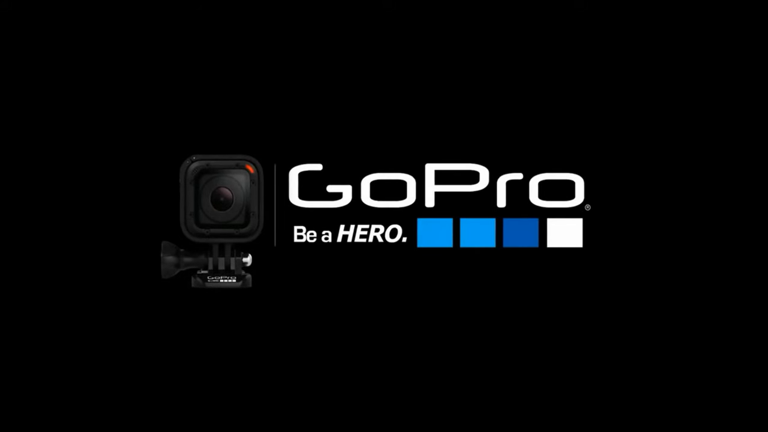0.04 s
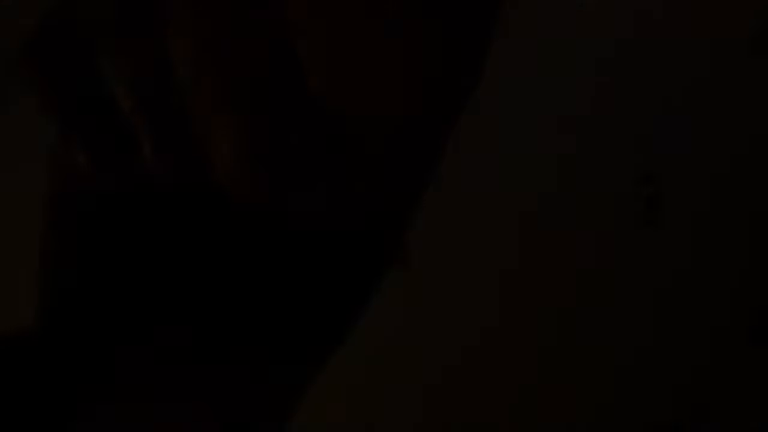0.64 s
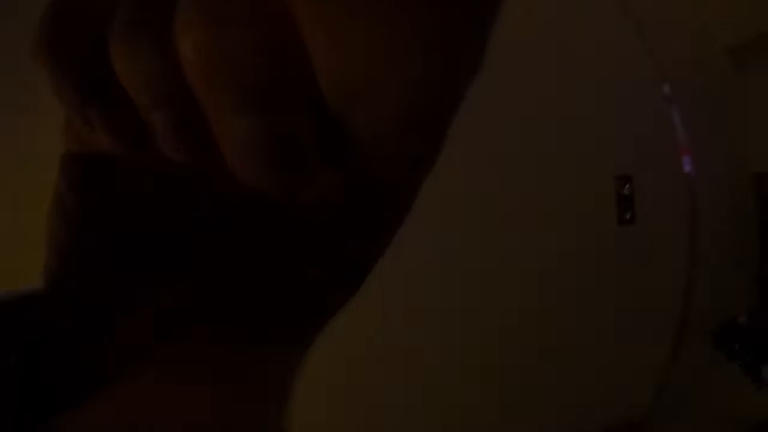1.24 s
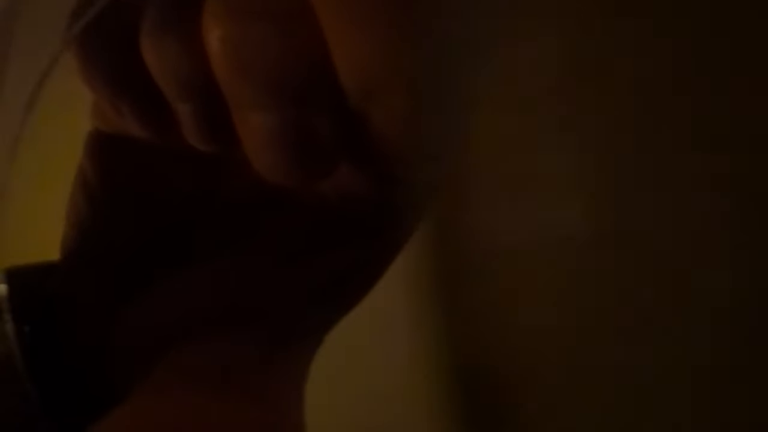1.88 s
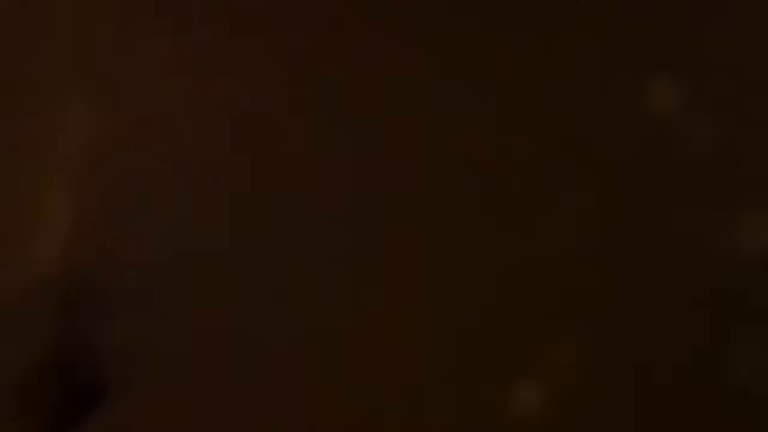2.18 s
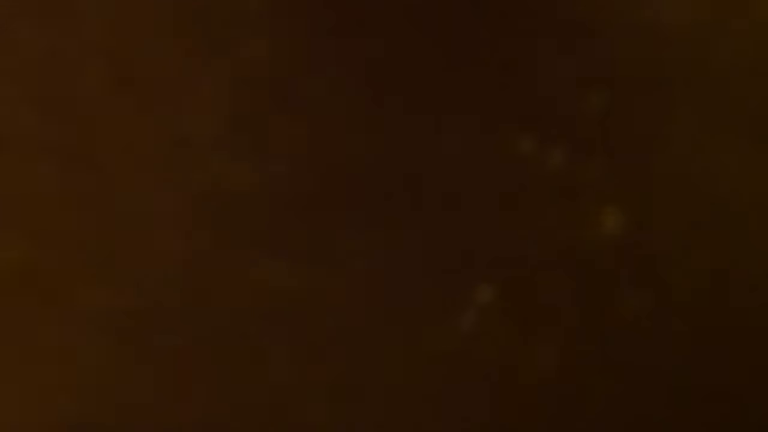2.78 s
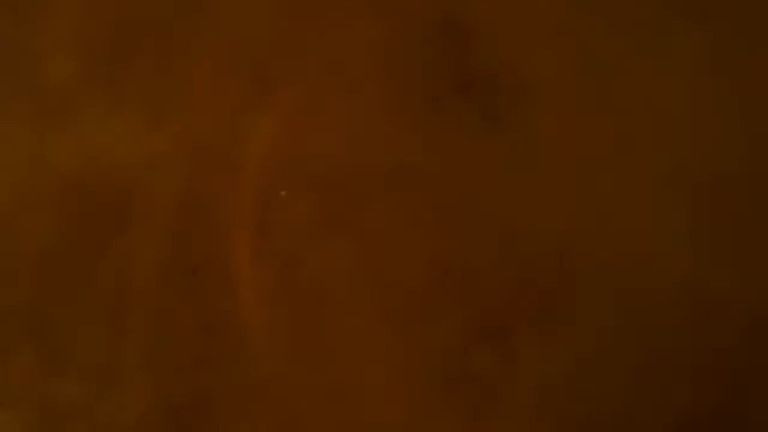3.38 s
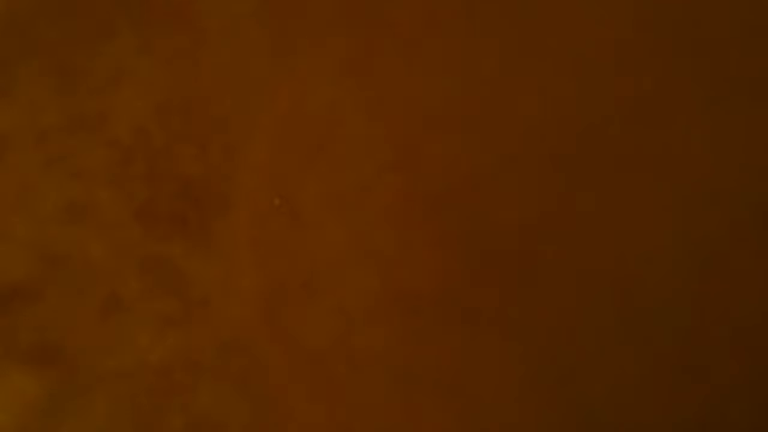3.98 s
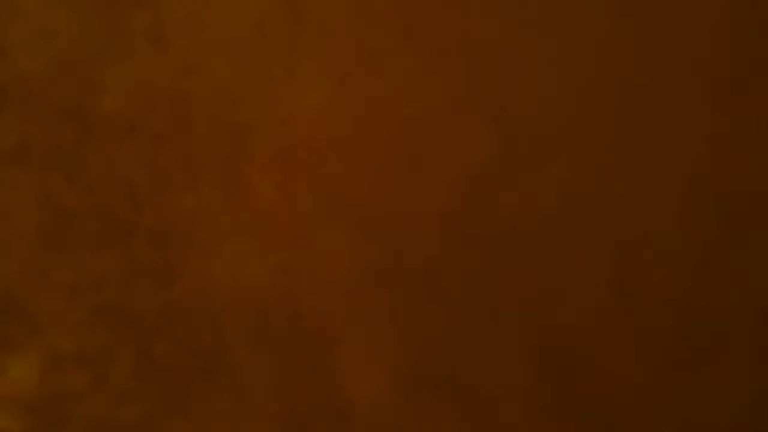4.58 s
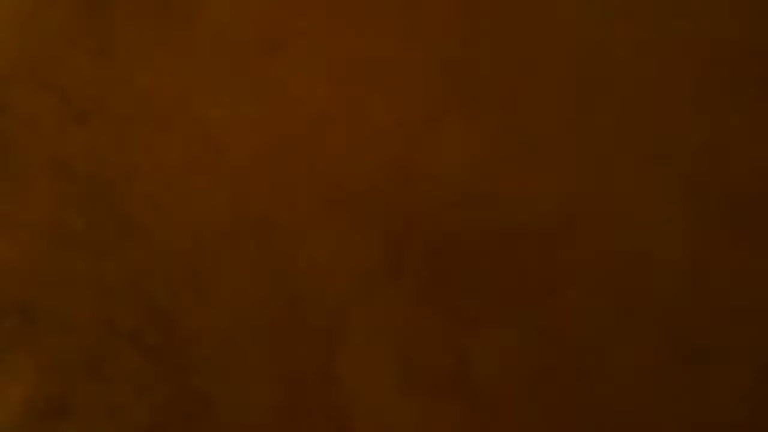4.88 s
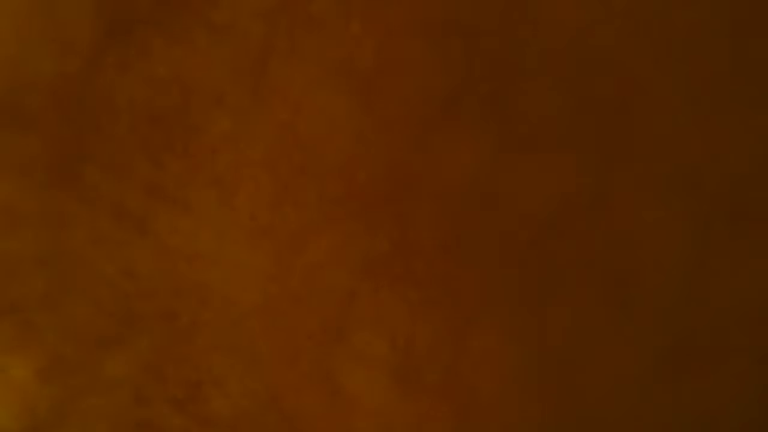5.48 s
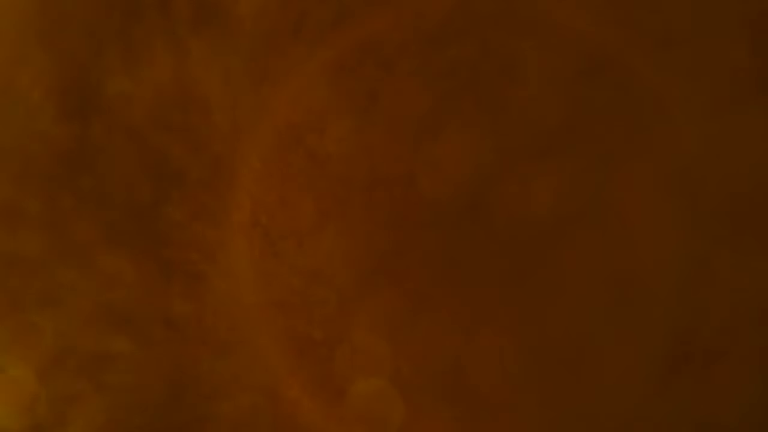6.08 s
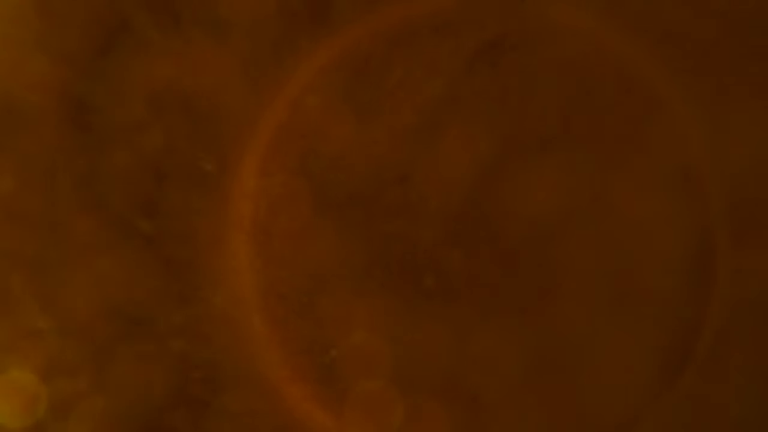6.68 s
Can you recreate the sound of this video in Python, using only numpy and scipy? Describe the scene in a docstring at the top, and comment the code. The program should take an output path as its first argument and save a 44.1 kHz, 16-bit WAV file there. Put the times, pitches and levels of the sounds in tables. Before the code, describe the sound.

Heard from a small waterproof microphone inside a glass, a soft knock is followed by crisp drops and a wet splatter as beer pours in. The liquid closes over the microphone and the sound turns to rapid, muffled plopping and glugging with bright ticks of spray. The hollow tone of the glass rises as it fills, and the pour softens to small bubbles and fine crackling foam.

```python
"""Bottom of a glass, at a small waterproof camera, as beer is poured in.
The first drops spatter on the housing; once it is covered, the stream is heard from within the liquid
as dull plops. Each plop rings the beer and the air column above it. The beer's ring sinks as it deepens
and fills with gas; the column's pitch climbs as the glass fills. Foam fizzes and the camera whines."""
import sys
import numpy as np
from scipy import signal
from scipy.fft import rfft, irfft
from scipy.io import wavfile

SR = 44100
rng = np.random.default_rng(int(sys.argv[2]) if len(sys.argv) > 2 else 0)


def dump_mix(stems):
    """Bounce the given channels to the path in sys.argv[1] as a 16-bit WAV at rate SR."""
    frames = np.atleast_2d(stems).T  # one column per channel
    limited = np.clip(frames, -1, 1)  # hard clip at full scale
    pcm = np.round(limited * 32767).astype(np.int16)
    wavfile.write(sys.argv[1], SR, pcm)


N = 297234
TIME = np.arange(N) / SR
POUR_S, COVERED_S, SHALLOW_UNTIL_S, SUBMERGED_S = 1.23, 1.6, 2, 2.28  # covered: bottom; submerged: camera

# spectrum of a drop on the housing: f/Hz, level/dB
DROP_SPECTRUM = [(1300, -45), (2500, -23), (4000, -2.5), (5200, -5.5), (7000, 0), (9000, 3.5), (11000, 7.5),
                 (13000, 4), (16000, -7.5)]
# spectrum of a wet splash: f/Hz, level/dB
SPLASH_SPECTRUM = [(500, -5), (1100, -5), (1750, 2), (2300, -2), (2900, 1), (3700, -2.5), (5000, -9.5),
                   (6500, -7.5), (7600, -13)]


def from_db(db):
    """Decibels to gain."""
    return 10 ** (np.asarray(db) / 20)


def rms_one(x):
    """Scale to rms 1."""
    return x / np.sqrt(np.mean(x ** 2) + 1e-20)


def in_time(rows):
    """Interpolate rows of (t/s, values...) to one curve per column."""
    times_s, *columns = np.transpose(rows)
    return [np.interp(TIME, times_s, column) for column in columns]


def add(out, at_s, sound):
    """Mix a short sound in."""
    i = max(int(at_s * SR), 0)
    out[..., i:i + sound.shape[-1]] += sound[..., :N - i]


def drift(knots_per_s):
    """Random wander: lines between unit Gaussian knots."""
    knots = rng.standard_normal(2000)
    return np.interp(TIME * knots_per_s, np.arange(len(knots)), knots)


def trapezoid(start_s, attack_s, end_s, release_s):
    """Linear fade in, hold at 1, fade out."""
    return np.clip(np.minimum((TIME - start_s) / attack_s, (end_s - TIME) / release_s), 0, 1)


def colour(x, spectrum, size=2048):
    """Minimum-phase filter of unit energy with the given spectrum."""
    hz, db = np.transpose(spectrum)
    grid_hz = np.maximum(np.arange(size // 2 + 1) * SR / size, 1)
    gain = from_db(np.interp(np.log(grid_hz), np.log(hz), db))
    cepstrum = irfft(np.log(gain))
    cepstrum[1:size // 2] *= 2
    cepstrum[size // 2 + 1:] = 0
    response = irfft(np.exp(rfft(cepstrum)))
    return signal.fftconvolve(x, response[None] / np.linalg.norm(response), axes=-1)[:, :N]


def panned(x, pan_db):
    """Place between the two microphone ports; pan is left minus right."""
    return x * from_db(np.array([[.5], [-.5]]) * pan_db)


def stereo_noise(correlation):
    """White noise, partly common to both ports."""
    shared, own = rng.standard_normal(N), rng.standard_normal((2, N))
    return np.sqrt(correlation) * shared + np.sqrt(1 - correlation) * own


def band_noise(low_hz, high_hz):
    """Band-passed noise, rms 1."""
    band = signal.butter(2, [low_hz, high_hz], "band", fs=SR, output="sos")
    return rms_one(signal.sosfilt(band, rng.standard_normal(N)))


def grains(per_s, spread_db):
    """Random clicks, many small and a few large."""
    sizes = from_db(spread_db * np.minimum(rng.exponential(1, N), 2.7))
    return sizes * (rng.random(N) < per_s / SR)


def crackle(per_s, spread_db, grain_s, correlation):
    """Tiny noise bursts in loose spurts, rms 1."""
    spurt_db, spurts_per_s = 3.3, 45
    sizes = grains(per_s, spread_db) * from_db(spurt_db * drift(spurts_per_s)) / np.sqrt(per_s)
    t = np.arange(-400, 400) / SR
    grain = np.exp(-abs(t) / grain_s * np.where(t < 0, 4, 2))
    power = np.maximum(signal.fftconvolve(sizes ** 2, grain, "same"), 0)
    return rms_one(np.sqrt(power) * stereo_noise(correlation))


def ring(hz, decay_s, soft_s, highpass_ratio, size=2400):
    """A rounded suction pulse drives a damped mode; little leaks out far below its pitch."""
    t, push_t = TIME[:size], TIME[:size // 20]
    push = np.exp(-.5 * (push_t / soft_s - 3) ** 2)
    push /= abs(np.sum(push * np.exp(-2j * np.pi * hz * push_t)))  # unit gain at the mode
    mode = np.sin(2 * np.pi * hz * t) * np.exp(-t / decay_s)
    swing = np.gradient(mode) * SR / (2 * np.pi * hz)
    pole = np.exp(-2 * np.pi * highpass_ratio * hz / SR)
    radiated = signal.lfilter([1, -1], [1, -pole], swing)
    return -np.convolve(radiated, push)[:size]


def snap(hz, cycles, soft_s):
    """A very short ring, peak 1."""
    sound = ring(hz, cycles / hz, soft_s, highpass_ratio=.23)
    return sound / abs(sound).max()


def bubble(hz, cycles, rise, swell_cycles=.28):
    """A bubble swells in and rings; its pitch climbs by the fraction `rise` per 1/e of decay."""
    turns = hz * TIME[:2500]
    envelope = (1 - np.exp(-(turns / swell_cycles) ** 2)) * np.exp(-turns / cycles)
    phase = 2 * np.pi * turns * (1 + rise * (turns / cycles / 2 - 1))
    return envelope / envelope.max() * np.sin(phase)


def splashes(clicks, decay_s):
    """Each click becomes a short wet burst of the same energy."""
    fall = np.exp(-2 * TIME[:SR // 20] / decay_s)
    power = np.maximum(signal.fftconvolve(clicks ** 2, fall / fall.sum())[:N], 0)
    return colour(np.sqrt(power) * rng.standard_normal((1, N)), SPLASH_SPECTRUM)[0]


def air_hz(at_s, empty_m=.146, shortest_m=.04, fill_m_per_s=.0085, fill_m_per_s2=.0033):
    """Quarter-wave pitch of the air column, which shortens a little faster as the head builds."""
    sound_m_per_s = 343
    t = np.maximum(at_s - COVERED_S, 0)
    length_m = np.maximum(empty_m - fill_m_per_s * t - fill_m_per_s2 * t ** 2 / 2, shortest_m)
    return sound_m_per_s / (4 * length_m)


def liquid_hz(at_s, shallow_hz=244, submerged_hz=523, deep_hz=155, sink_s=.812):
    """The beer's ring: low in the shallows, high over the camera, then sinking with depth and gas."""
    if at_s < SHALLOW_UNTIL_S:
        return shallow_hz
    return deep_hz + (submerged_hz - deep_hz) * np.exp(-max(at_s - SUBMERGED_S, 0) / sink_s)


def liquid_cycles(at_s, clear_cycles=2.7, gassy_cycles=.84, clouding_s=.72):
    """Cycles to 1/e: the ring shortens as the beer clouds with gas."""
    clarity = np.exp(-max(at_s - SUBMERGED_S, 0) / clouding_s)
    return gassy_cycles + (clear_cycles - gassy_cycles) * clarity


def camera(hiss_db=-50.5, whine_hz=15626, waver_db=2.3):
    """Electronics: bright hiss at both ports, a thin wavering whine on the right."""
    # hiss: f/Hz, level/dB
    hiss_spectrum = [(59, -31), (100, 3.5), (196, 2.5), (236, -0.5), (472, -4.5), (570, -8), (1920, -15),
                     (2800, -11), (4000, -12.5), (5150, -10), (5960, -9.5), (8880, -4.5), (15000, -4)]
    # whine: t/s, level/dB
    whine_levels = [(0.0, -52), (0.2, -61), (0.49, -47.5), (1.48, -55), (2.03, -50), (2.05, -61),
                    (3.11, -47.5), (3.36, -62), (6.18, -48.5), (6.4, -69), (6.48, -54), (6.74, -58)]
    hiss = from_db(hiss_db) * colour(stereo_noise(correlation=.14), hiss_spectrum)
    whine_rms = from_db(in_time(whine_levels)[0] + waver_db * drift(40))
    whine = np.sqrt(2) * whine_rms * np.sin(2 * np.pi * whine_hz * TIME)
    return panned(hiss, pan_db=-.7) + panned(whine, pan_db=-12)


def settling(level_db=-60, fade_s=(.3, .97)):
    """Faint ticks on the housing before the pour."""
    ticks = colour(crackle(per_s=40, spread_db=0, grain_s=.0005, correlation=.89), DROP_SPECTRUM)
    return from_db(level_db) * np.interp(TIME, fade_s, [1, 0]) * ticks


def knocks(soft_cycles=.11, air_db=-13, air_decay_s=.013):
    """Dead knocks as the empty glass is handled; each faintly rings the air inside."""
    # knocks: t/s, peak/dB, f/Hz
    taps = [(0.18, -45.5, 2730), (0.979, -32.5, 635)]
    out = np.zeros(N)
    for at_s, db, hz in taps:
        hollow = bubble(air_hz(at_s), air_decay_s * air_hz(at_s), rise=0)
        add(out, at_s, from_db(db) * snap(hz, cycles=.62, soft_s=soft_cycles / hz))
        add(out, at_s, from_db(db + air_db) * hollow)
    return out


def surge(still_db=-78, pouring_db=-70):
    """Slow pressure swings on the housing: a faint floor that rises with the pour, and a few swells."""
    # liquid pushing on the housing: t/s, level/dB, half-width/s
    pushes = [(1.53, -37, 0.02), (1.873, -48, 0.022), (2.2, -62, 0.14), (2.98, -43, 0.17),
              (4.735, -56, 0.041)]
    swells = sum(from_db(db) * np.exp(-((TIME - at_s) / width_s) ** 2) for at_s, db, width_s in pushes)
    floor = from_db(np.where(TIME < POUR_S, still_db, pouring_db))
    return (floor + swells) * band_noise(low_hz=30, high_hz=95)


def foam():
    """Dense wet spray while the stream hits the shallows, easing to a fine sparkle of foam."""
    # spray and foam: t/s, splash level/dB, fizz level/dB
    levels = [(1.2, -44, -65), (1.31, -87, -61), (1.52, -55, -62), (1.55, -55, -36.5), (1.69, -58, -35),
              (1.85, -42, -35), (2.0, -52.5, -45), (2.25, -53, -57), (2.65, -56, -45), (2.95, -51, -51),
              (3.2, -53, -42), (3.6, -53.5, -48.5), (4.16, -55, -48), (5.13, -59.5, -52), (6.2, -62, -54),
              (6.74, -67, -54.5)]
    # fizz: f/Hz, level/dB
    fizz_spectrum = [(2350, -22), (4000, 0), (5050, -1.5), (6580, 0), (8210, 1), (9740, 6.5), (11700, 3),
                     (15000, -11)]
    splash_db, fizz_db = in_time(levels)
    splash = colour(crackle(per_s=410, spread_db=1.5, grain_s=.0013, correlation=1), SPLASH_SPECTRUM)
    shallow = TIME < SHALLOW_UNTIL_S
    per_s, spread_db = np.where(shallow, 420, 520), np.where(shallow, 3.5, 1.5)
    fizz = colour(crackle(per_s, spread_db, grain_s=.0006, correlation=.0053), fizz_spectrum)
    return (TIME > POUR_S) * (from_db(splash_db) * splash + panned(from_db(fizz_db) * fizz, pan_db=-1))


def flecks(level_db=-44):
    """Droplets thrown off the first drops tick sharply on the dry housing."""
    ticks = colour(crackle(per_s=170, spread_db=4, grain_s=.0004, correlation=.079), DROP_SPECTRUM)
    return from_db(level_db) * (TIME > POUR_S) * (TIME < COVERED_S) * ticks


def bubbles():
    """Single ringing bubbles; the heavily damped ones glide the most."""
    # bubbles: t/s, peak/dB, f/Hz, 1/e decay/cycles
    singles = [(1.232, -34, 220, 1.5), (1.237, -18, 3045, 12), (1.238, -22, 3340, 8.2),
               (1.263, -27.5, 216, 0.98), (1.365, -20.5, 4100, 11), (1.378, -36.5, 254, 1.2),
               (1.406, -39, 330, 0.55), (1.463, -34.5, 1590, 6.9), (1.582, -26, 3050, 4.4),
               (1.636, -34, 1750, 7.4), (1.687, -24, 3000, 7.2), (1.716, -22, 1680, 2.3),
               (1.809, -21, 876, 6), (1.849, -23.5, 1770, 3.5), (1.896, -32, 248, 1.2),
               (1.965, -19.5, 1680, 2), (2.015, -26, 2470, 4.5), (2.023, -25, 1690, 1.5),
               (2.130, -25.5, 1750, 1.6), (2.354, -35.5, 210, 0.91), (2.387, -36, 214, 1.7),
               (2.544, -32, 213, 1.3), (2.579, -31.5, 182, 1), (2.580, -27, 1800, 2.8),
               (2.827, -34.5, 189, 2.7), (3.282, -31, 287, 1.6), (3.799, -20, 2490, 8),
               (4.385, -20.5, 2030, 2.5), (5.179, -33, 1960, 4.7), (5.705, -38, 314, 0.87),
               (5.73, -34, 170, 0.92), (5.834, -37.5, 280, 2)]
    out = np.zeros(N)
    for at_s, db, hz, cycles in singles:
        add(out, at_s, from_db(db) * bubble(hz, cycles, rise=.13 / cycles))
    return out


def drops(splash_db=5.5, tail_db=-20, spot_hz=9800, spot_q=7.4, crack_to_wall_db=-20, mid_to_wall_db=21):
    """A drop spreads on the housing, cracks, dies in a few milliseconds and rings the glass wall."""
    # biggest drops: t/s, treble energy/dB, midrange energy/dB, left minus right/dB
    impacts = [(1.238, 2.5, -16, -1), (1.27, -4, -40, -2), (1.276, -10, -48, 5), (1.298, 7.5, -29, 1.5),
               (1.323, -20, -62, -1), (1.332, -7, -60, 0), (1.352, -21, -61, 0), (1.363, -14, -45, -5),
               (1.383, 2.5, -32, -1), (1.391, -9, -49, -4), (1.422, -27, -50, 0), (1.432, -1, -43, 0),
               (1.45, -6, -29, -7), (1.459, -3, -21, 3), (1.498, -6.5, -26.5, 0), (1.537, -0.5, -39, 11),
               (1.542, 3.5, -18, -10), (1.548, -5, -34, 3), (1.568, -5, -30, 5), (1.578, -6, -11.5, -5),
               (1.61, -8, -43, -4), (1.635, -0.5, -15, 0), (1.651, 2, -44, -6), (1.671, -9, -34, -1),
               (1.686, 3, -26, -4), (1.720, 2, -15, 1), (1.731, -3.5, -35, -4), (1.757, -2, -30, -8),
               (1.764, -2.5, -26, 1), (1.805, 5.5, -30, -8), (1.808, -2, -7.5, -4), (1.853, -7.5, -27, -2),
               (1.885, -0.5, -15.5, -4), (1.892, 1, -23, 0), (1.904, -11, -20.5, 10), (1.937, -8, -21, 0),
               (1.979, -6, -16.5, 3), (2.017, 2, -11.5, -1), (2.025, -14, -24, -2), (2.307, -11.5, -24, 9),
               (2.411, -10, -49, 7), (2.482, -16, -37, 4), (2.499, -1, -35, 0), (2.530, -6.5, -26, -1),
               (2.652, -4, -26, 4), (2.656, 5, -29, 3), (2.680, -2, -33, 5), (2.737, -6.5, -18.5, 5),
               (2.799, 1.5, -29, -4), (2.835, -10.5, -39, 1), (2.872, -4.5, -40, -4), (3.045, -17, -40, -1),
               (3.077, -7.5, -17.5, -5), (3.115, -7.5, -38, 1), (3.218, -6, -21, -1), (3.256, 2, -21, -5),
               (3.289, 0.5, -22.5, -3), (3.322, -6.5, -31, -3), (3.376, -8.5, -39, -1),
               (3.475, -16, -42, 3), (3.773, -18.5, -19, -3), (3.926, -15.5, -35, 4),
               (3.834, -0.5, -41, -4), (4.023, 1.5, -14.5, 2), (4.073, -2.5, -25, 6), (4.089, -7, -18, -7),
               (4.102, -12, -30, -2), (4.147, -14, -29, -1), (4.55, -20, -19.5, -1),
               (5.064, -16, -22.5, -5), (5.343, -17.5, -33, -3), (5.391, -18.5, -37, 2)]
    lead_s, rise_s, crack_s, tail_s = .004, .00025, .0007, .0045
    t = TIME[:1100] - lead_s
    envelope = np.exp(-abs(t) / np.where(t < 0, rise_s, crack_s))
    envelope += from_db(tail_db) * np.exp(-abs(t) / np.where(t < 0, tail_s / 2, tail_s))
    cracks, splash = np.zeros((2, 2, N))
    blows = np.zeros(N)
    for at_s, treble_db, mid_db, pan_db in impacts:
        bursts = rng.standard_normal((3, len(t))) * envelope  # left crack, right crack, splash
        hz = min(spot_hz * np.exp(rng.uniform(-.4, .35)), 15000)  # each spot has its own resonance
        bursts[:2] += 2 * signal.lfilter(*signal.iirpeak(hz, spot_q, fs=SR), bursts[:2])
        bursts /= np.linalg.norm(bursts, axis=1, keepdims=True)
        start_s = at_s - lead_s + rise_s
        add(cracks, start_s, panned(bursts[:2] * from_db(treble_db), pan_db))
        add(splash, start_s, bursts[2] * from_db(mid_db + splash_db))
        blows[int(at_s * SR)] = from_db(treble_db + crack_to_wall_db) + from_db(mid_db + mid_to_wall_db)
    return colour(cracks, DROP_SPECTRUM) + colour(splash, SPLASH_SPECTRUM) + glass_wall(blows)


def glass_wall(blows, gain_db=-3, spread_db=1.5, pitch_spread=.018, port_spread_rad=.7):
    """Wall modes ring differently at each blow and port; the rising beer damps them."""
    # wall modes: f/Hz, level/dB, dry T60/s
    modes = [(2870, -37.5, 0.09), (5260, -38, 0.046)]
    t, out = TIME[:SR // 8], np.zeros((2, N))
    for i in np.flatnonzero(blows):
        damping = 1 + 1.6 * max(i / SR - COVERED_S, 0)
        for hz, db, t60_s in modes:
            louder, higher, apart = rng.standard_normal(3)
            envelope = from_db(db + gain_db + spread_db * louder - 60 * damping * t / t60_s)
            phase = 2 * np.pi * hz * (1 + pitch_spread * higher) * t
            port_rad = port_spread_rad * apart * np.array([[1], [-1]])
            add(out, i / SR, blows[i] * envelope * np.sin(phase + port_rad))
    return out


def puddle(level_db=-53, waver_db=6.5, start_s=1.36, start_hz=330, rise_hz_per_s=1080):
    """A faint tone glides up to the air column's pitch as the bottom is first covered."""
    hz = np.minimum(start_hz + rise_hz_per_s * (TIME - start_s), air_hz(TIME))
    envelope = trapezoid(start_s, attack_s=.059, end_s=1.69, release_s=.15)
    return from_db(level_db + waver_db * drift(57.86)) * envelope * np.sin(2 * np.pi * np.cumsum(hz) / SR)


def splatter(level_db=-33, centre_hz=1750, pitch_spread=.064, cluster_s=.016, count=26):
    """The stream whips clusters of three small, quickly damped bubbles into the shallow beer."""
    out = np.zeros(N)
    for at_s in np.linspace(COVERED_S - .03, SUBMERGED_S - .08, count) + rng.uniform(-.012, .012, count):
        for hz in centre_hz * np.exp(pitch_spread * rng.standard_normal(3)):
            add(out, at_s + cluster_s * rng.random(), snap(hz, cycles=1.05, soft_s=.00005))
    return from_db(level_db) * out


def churn(spread_db=3.5, air_gain_db=.5, splash_db=-12, foam_damping_per_s=.73):
    """Small plops fill the gaps, finer, denser and more varied as foam builds. Returns liquid, air."""
    # small plops: t/s, liquid level/dB, air column level/dB
    levels = [(1.6, -68, -62), (2.08, -84, -49.5), (2.29, -87, -54.5), (2.52, -62, -38.5),
              (2.96, -41, -39.5), (3.81, -42.5, -40.5), (4.23, -47, -49), (4.8, -50, -54),
              (5.83, -51.5, -54.5), (6.49, -58.5, -66.5), (6.74, -60.5, -62)]
    clicks = grains(per_s=np.interp(TIME, [4.3, 5.7], [95, 190]), spread_db=spread_db)
    liquid, air = np.zeros((2, N))
    for i in np.flatnonzero(clicks):
        at_s = i / SR
        beer_detune, column_detune = np.clip(rng.standard_normal(2), -1.2, 2)
        gassy = np.interp(at_s, [3.1, 4.6], [0, 1])
        pitch_spread = .35 + .11 * gassy
        beer_hz = liquid_hz(at_s) * 1.43 ** gassy * np.exp(pitch_spread * beer_detune)
        beer = ring(beer_hz, 1.08 * liquid_cycles(at_s) / beer_hz, soft_s=.00028, highpass_ratio=.53)
        column_hz = air_hz(at_s) * np.exp(.055 * column_detune)
        column_cycles = 8.2 * np.exp(-foam_damping_per_s * (at_s - 3))
        column = ring(column_hz, column_cycles / column_hz, soft_s=.11 / column_hz, highpass_ratio=.5)
        add(liquid, at_s, clicks[i] * rms_one(beer))
        add(air, at_s, clicks[i] * rms_one(column))
    air = rms_one(air) + from_db(splash_db) * rms_one(splashes(clicks, decay_s=.0057))
    liquid_db, air_db = in_time(levels)
    flowing = TIME > COVERED_S
    return flowing * np.array([from_db(liquid_db) * rms_one(liquid), from_db(air_db + air_gain_db) * air])


def plops(tick_db=-12, soft_s=.00018, pitch_spread=.02, foam_damping_per_s=.72):
    """Air pockets ring beer and air column, closing with a splash and a tick. Returns liquid, air."""
    # biggest plunging pockets: t/s, liquid level/dB, column level/dB, splash energy/dB, liquid f/Hz
    pockets = [(1.809, -44, -18.5, -28, 134), (1.82, -24.5, -20, -9, 260), (1.909, -26.5, -45, -15.0, 630),
               (1.923, -54, -30.0, -16.0, 450.0), (2.011, -58, -35, -8, 120.0),
               (2.023, -21.5, -32, -22.0, 648), (2.154, -62, -31, -19, 120.0),
               (2.18, -66, -36.0, -23, 140.0), (2.201, -50, -35.0, -18.5, 590),
               (2.231, -48, -28.5, -16, 555.0), (2.264, -38, -33, -38, 505.0), (2.308, -9, -11.5, -10, 535),
               (2.315, -19, -12.5, -12, 510), (2.365, -17.5, -22.0, -26, 474),
               (2.382, -34.5, -24, -23.0, 245.0), (2.405, -18.5, -27, -17, 523),
               (2.499, -53, -19, -15.0, 146), (2.525, -20.0, -35, -23.0, 430),
               (2.565, -17, -22.5, -36, 395), (2.597, -18, -26, -17, 385.0), (2.655, -12, -17.0, -8, 417),
               (2.723, -39, -22, -12.0, 330.0), (2.745, -24, -27, -22.0, 380),
               (2.763, -36, -23.5, -30.0, 610.0), (2.777, -20.5, -34, -21, 350),
               (2.808, -21, -26, -25, 406), (2.846, -14, -43.0, -29, 305), (2.868, -22.5, -33.0, -25, 560),
               (2.926, -25, -15.5, -24, 350.0), (2.95, -22.5, -21, -28, 328),
               (3.001, -31.0, -37, -13.5, 390.0), (3.021, -21, -16.5, -7, 310.0),
               (3.062, -23, -19.5, -10, 350.0), (3.082, -30, -21.5, -10.5, 165.0),
               (3.096, -42, -42, -11.5, 350.0), (3.124, -14.5, -15, -13.5, 357),
               (3.152, -18, -19, -21, 257), (3.217, -9.5, -15, -9.5, 315.0),
               (3.26, -14.5, -16.5, -11.5, 253), (3.302, -10.5, -15.0, -15, 285),
               (3.333, -30, -26, -22.0, 635.0), (3.389, -20.0, -53, -28.0, 260.0),
               (3.416, -33.0, -33, -32, 635.0), (3.45, -24, -16, -13, 300.0),
               (3.458, -26.5, -17.0, -12.5, 178), (3.516, -16.5, -24, -19.5, 244),
               (3.53, -37, -18, -19, 260.0), (3.611, -21.5, -19.5, -14, 213),
               (3.642, -27, -24.5, -17, 220.0), (3.68, -24, -24.5, -30, 250.0),
               (3.715, -22, -18, -16.5, 350.0), (3.738, -23, -20.5, -34, 405.0),
               (3.78, -32, -25.0, -14.0, 215.0), (3.852, -28, -19.0, -37, 398),
               (3.898, -30, -25, -16, 175.0), (3.925, -23.5, -19.0, -24, 200),
               (3.944, -20.5, -25.0, -35.0, 212), (3.957, -27.0, -25, -38, 434),
               (4.07, -21.5, -12, -6, 277), (4.08, -17.0, -11.5, -9, 202), (4.101, -24, -19, -16.5, 190.0),
               (4.259, -20.5, -32, -20.5, 170), (4.277, -22.5, -51, -46, 360),
               (4.369, -19.5, -14.5, -14.5, 173), (4.55, -31, -22.5, -14.5, 365.0),
               (4.595, -24.5, -27, -36, 145.0), (4.659, -26.5, -35, -19, 185.0),
               (4.719, -38.0, -25.5, -15.5, 367), (4.733, -20, -22, -24, 161),
               (4.778, -27, -33, -19.5, 194), (4.844, -21, -22.5, -32, 288), (4.875, -32, -34, -23, 280.0),
               (4.952, -33.0, -22.5, -28, 144), (4.99, -39, -45.0, -27, 145.0),
               (5.053, -32, -27.5, -32, 415.0), (5.206, -30, -34, -33, 265.0),
               (5.533, -25.5, -31.0, -46, 235.0), (5.66, -31.5, -43.0, -33, 245.0),
               (5.772, -28.5, -32, -33, 130.0)]
    liquid, air, clicks = np.zeros((3, N))
    for at_s, liquid_db, column_db, splash_db, beer_hz in pockets:
        beer = ring(beer_hz, liquid_cycles(at_s) / beer_hz, soft_s, highpass_ratio=1)
        column_hz = air_hz(at_s) * (1 + pitch_spread * rng.standard_normal())
        column_decay_s = .004 * np.exp(-foam_damping_per_s * (at_s - 3))
        column = ring(column_hz, column_decay_s, soft_s=.00024, highpass_ratio=.25)
        add(liquid, at_s - soft_s, from_db(liquid_db) * beer)
        add(air, at_s - soft_s, from_db(column_db) * column)
        clicks[int(at_s * SR)] = from_db(splash_db)
    ticks = from_db(tick_db) * colour(clicks[None], DROP_SPECTRUM)[0]
    return np.array([liquid, air + splashes(clicks, decay_s=.0042) + ticks])


def gurgle(level_db=-35, fade_db_per_s=5.5, spread_db=3, pitch_spread=.42, jitter_s=.04, count=60):
    """Large bubbles carried down by the stream: rising glugs pitched between beer and air column."""
    out = np.zeros(N)
    for at_s in np.linspace(2.35, 6.1, count):
        louder, later, higher = rng.standard_normal(3)
        db = level_db - fade_db_per_s * (at_s - 3) + spread_db * louder
        hz = min(1.05 * liquid_hz(at_s) * np.exp(pitch_spread * abs(higher)), air_hz(at_s))
        add(out, at_s + jitter_s * later, from_db(db) * bubble(hz, cycles=4.1, rise=.06))
    return out


def tinkle(level_db=-41, fade_db_per_s=9, spread_db=4.5, centre_hz=2500, pitch_spread=.377, count=150):
    """Small bubbles of many sizes ring briefly, ever fainter under the head."""
    out = np.zeros(N)
    for at_s in rng.uniform(2.35, 5.5, count):
        louder, higher = np.clip(rng.standard_normal(2), -2, 2)
        db = level_db - fade_db_per_s * max(at_s - 3.3, 0) + spread_db * louder
        hz = centre_hz * np.exp(pitch_spread * higher)
        add(out, at_s, from_db(db) * bubble(hz, cycles=5.9, rise=.034))
    return out


def pops(gain_db=1.5, small_db=(-42, -36), centre_hz=3300, pitch_spread=.51, stagger_s=.0026):
    """A bursting foam cell takes two neighbours with it; small bursts fall at random among big ones."""
    # biggest cells bursting in the head: t/s, level/dB
    big = [(4.317, -30.5), (4.425, -36), (4.879, -31), (4.911, -41.5), (4.997, -32.5), (5.06, -40),
           (5.108, -31.5), (5.225, -33), (5.341, -31.5), (5.352, -34), (5.473, -33)]
    small = [(rng.uniform(4.6, 6.1), rng.uniform(*small_db)) for _ in range(10)]
    out = np.zeros(N)
    for at_s, db in big + small:
        for cell in range(3):
            hz = min(centre_hz * np.exp(pitch_spread * rng.standard_normal()), SR / 5)
            peak = from_db(db + gain_db) / (1 + cell / 2)
            add(out, at_s + cell * stagger_s * rng.random(), peak * snap(hz, cycles=.9, soft_s=.00003))
    return out


def head(level_db=-62, half_width_hz=330, flutter_db=5):
    """Near the brim, fine foam simmers into the short air column."""
    lowpass = signal.butter(2, half_width_hz, fs=SR, output="sos")
    noise = signal.sosfilt(lowpass, rng.standard_normal((2, N)))
    carrier = np.exp(2j * np.pi * np.cumsum(air_hz(TIME)) / SR)
    simmer = rms_one(np.real((noise[0] + 1j * noise[1]) * carrier))
    envelope = trapezoid(start_s=4.63, attack_s=.38, end_s=6.4, release_s=.13)
    return from_db(level_db + flutter_db * drift(150)) * envelope * simmer


def rumble(level_db=-56, centre_hz=42, start_s=5.88, attack_s=.15):
    """A deep rumble sets in as the glass nears full."""
    envelope = np.clip((TIME - start_s) / attack_s, 0, 1)
    return from_db(level_db) * envelope * band_noise(centre_hz / 1.2, centre_hz * 1.2)


def scene(left_lag_s=.00001):
    """Low sounds reach both ports almost in step through the liquid; spray differs between them."""
    liquid, air = plops() + churn()
    left, right = panned(liquid + gurgle(), pan_db=-2) + panned(air + puddle(), pan_db=-1.5)
    pour = np.array([np.interp(TIME - left_lag_s, TIME, left), right])
    bubbling = bubbles() + splatter() + tinkle() + pops() + head()
    pressure = surge() + rumble()
    spray = drops() + flecks() + foam()
    return pour + bubbling + pressure + spray + knocks() + settling() + camera()


def record(dry):
    """Full-scale clip, then a steep low-pass."""
    cutoff_hz = 16200
    lowpass = signal.ellip(12, .1, 95, cutoff_hz, fs=SR, output="sos")
    return signal.sosfilt(lowpass, np.clip(dry, -1, 1))


dry = scene()
out = record(dry)
dump_mix(out)
```